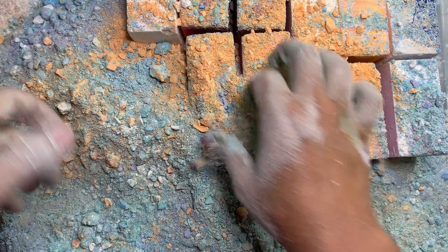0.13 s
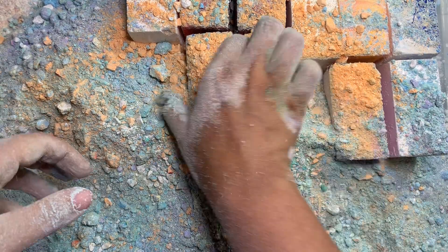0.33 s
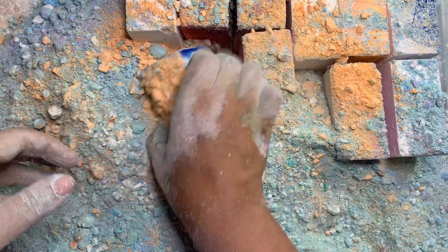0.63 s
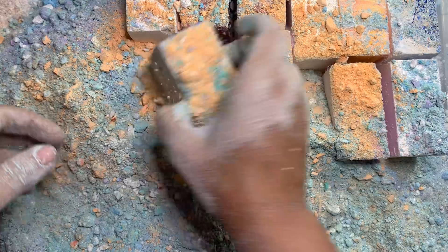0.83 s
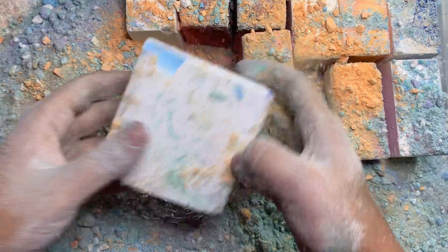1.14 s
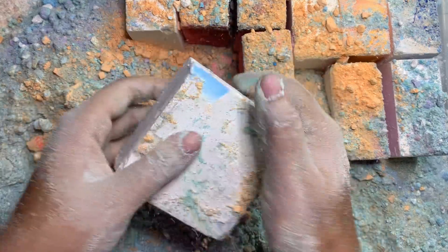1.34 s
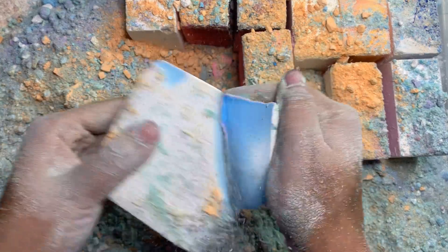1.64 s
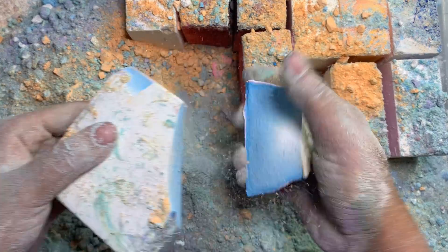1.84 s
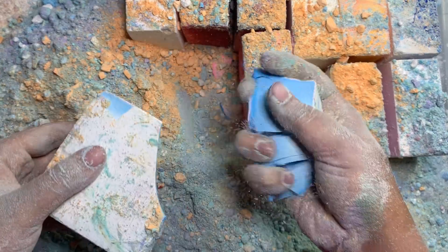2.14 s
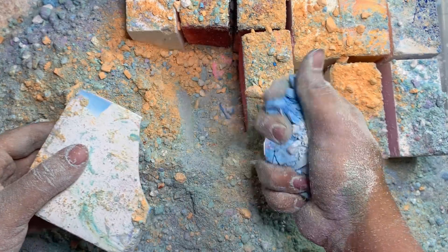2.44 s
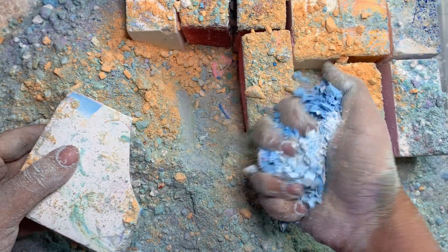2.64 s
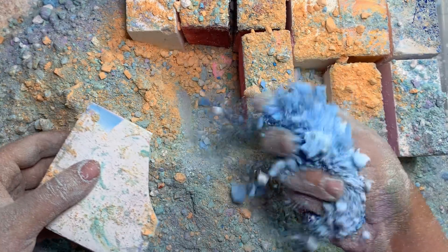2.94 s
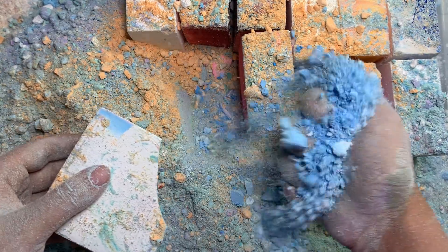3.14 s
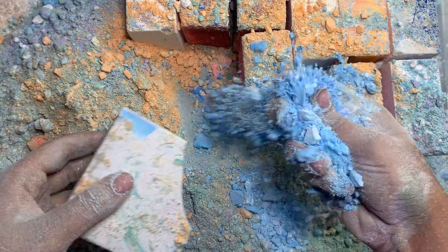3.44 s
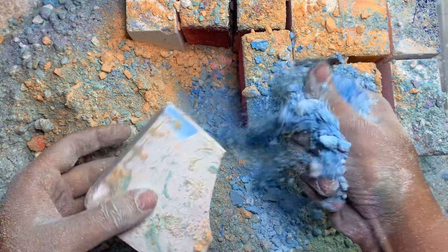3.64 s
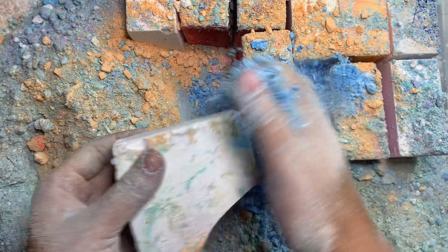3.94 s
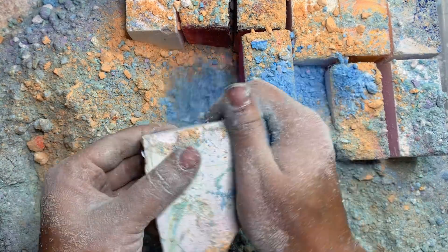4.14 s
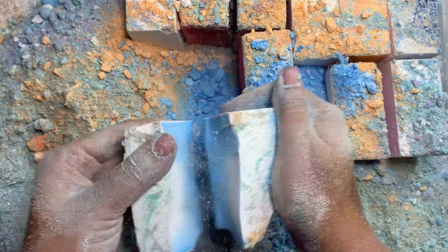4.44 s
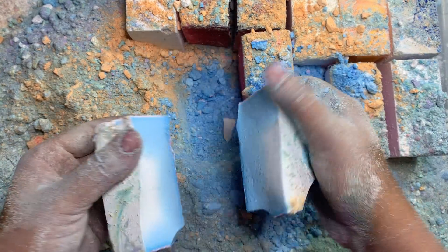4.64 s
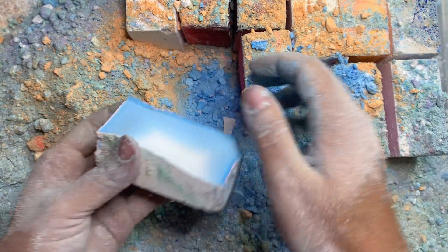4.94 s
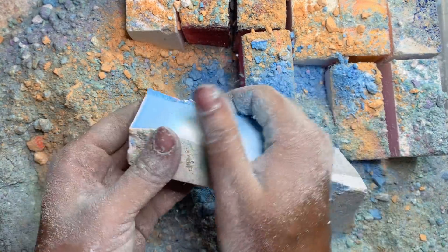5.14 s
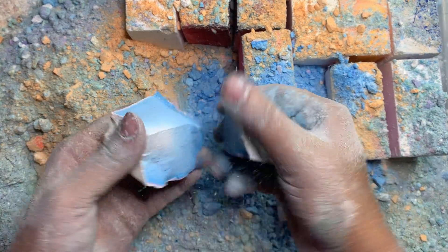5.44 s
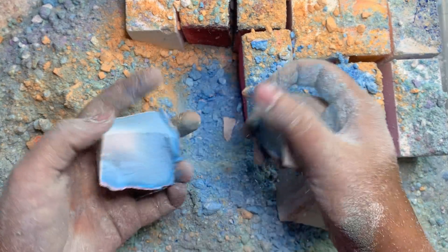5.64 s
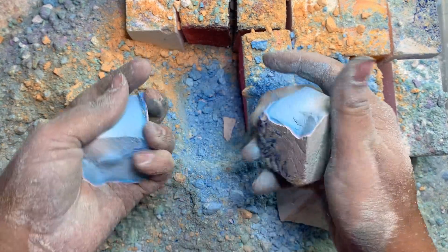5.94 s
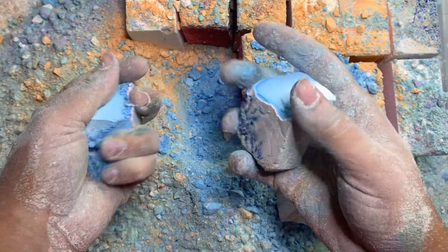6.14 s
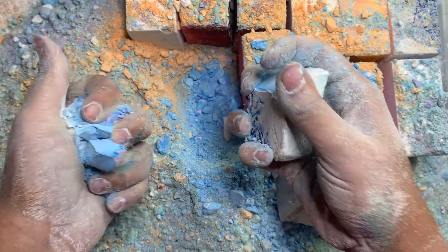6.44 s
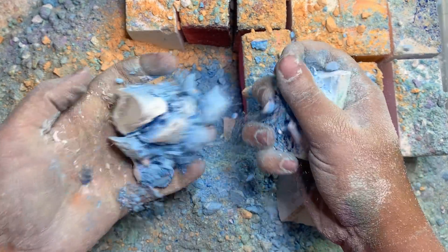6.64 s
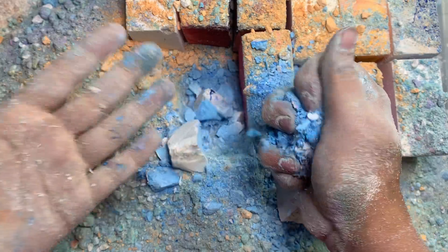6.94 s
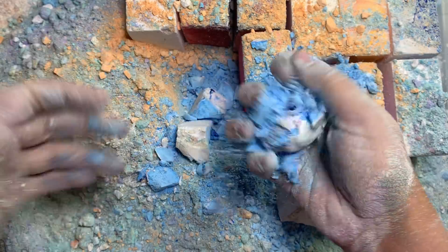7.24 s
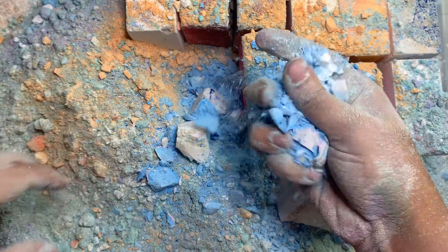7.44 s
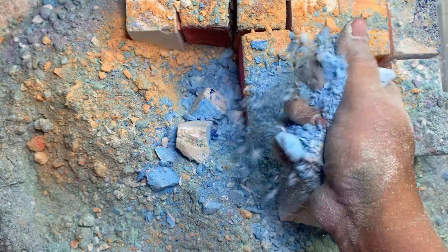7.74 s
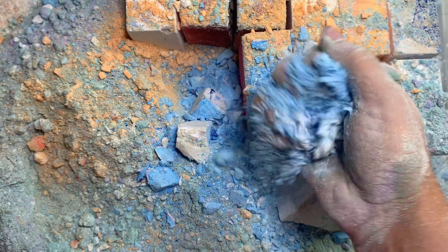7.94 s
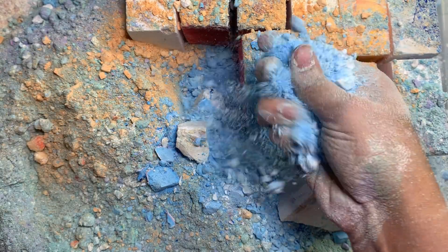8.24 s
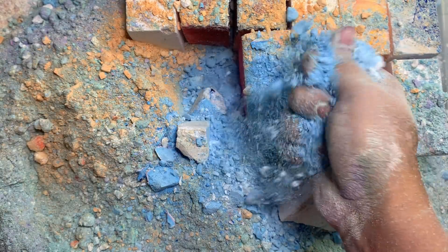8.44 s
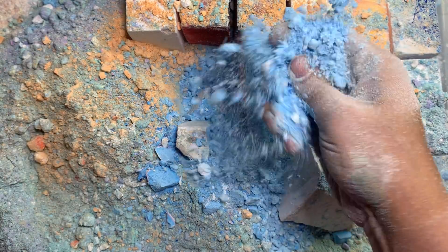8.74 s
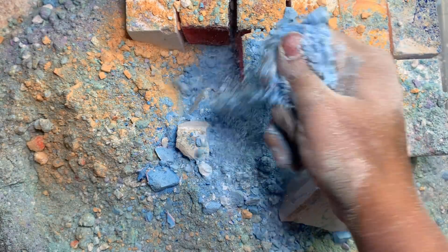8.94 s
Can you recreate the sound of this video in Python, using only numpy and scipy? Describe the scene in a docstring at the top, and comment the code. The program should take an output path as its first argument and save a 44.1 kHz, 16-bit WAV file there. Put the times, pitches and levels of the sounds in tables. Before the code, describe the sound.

Dry chalk breaks with crisp snaps and crunches into crumbs in squeezing hands, above a quiet low hum and soft swelling whoosh.

```python
"""A low appliance hum and a soft whoosh that swells and fades are heard first, with small rubs of fingers on chalk.
Hands then lift, snap and crumble soft chalk blocks over a table, close to a two-port microphone indoors.
Hum, air and whoosh are filtered noise; grit is clicks and powdery hiss shaped by hand pressure.
Cracks are short bursts of fractures, some with a thump of the block; bumps excite table resonances.
Fingers sliding on whole pieces make them ring faintly: the rubbing drives narrow resonances."""
import sys
import numpy as np
from scipy import signal
from scipy.fft import rfft, irfft
from scipy.io import wavfile
from scipy.ndimage import uniform_filter1d

SR = 44100
rng = np.random.default_rng(int(sys.argv[2]) if len(sys.argv) > 2 else 0)


def invert_db(x):
    """Field ratio 10**(x/20) for x, a level in decibels (scalar or array-like)."""
    u = np.asarray(x, float) / 20
    return 10 ** u


def persist_wave(psi):
    """Save psi, clipped to +-1, as 16-bit WAV."""
    counts = np.round(np.clip(psi, -1, 1) * 32767).astype(np.int16)
    wavfile.write(sys.argv[1], SR, np.atleast_2d(counts).T)


N = 400428
T = np.arange(N) / SR


def curve(table):
    """Columns of a breakpoint table, interpolated at every sample."""
    s, *columns = np.transpose(table)
    return [np.interp(T, s, c) for c in columns]


def unit(x):
    """Scale to rms 1."""
    return x / np.sqrt(np.mean(x ** 2))


def colour(x, points):
    """Causal filter through (Hz, dB) points, built from the cepstrum of the log gain."""
    hz, db = np.transpose(points)
    bins_hz = np.linspace(1, SR / 2, 2049)
    gain_db = np.interp(np.log(bins_hz), np.log(hz), db)
    cepstrum = irfft(np.log(invert_db(gain_db)))
    # folding the cepstrum onto positive time gives minimum phase
    cepstrum[1:2048] *= 2
    cepstrum[2049:] = 0
    impulse = irfft(np.exp(rfft(cepstrum)))
    impulse = impulse.reshape((1,) * (x.ndim - 1) + (-1,))
    return signal.fftconvolve(x, impulse, axes=-1)[..., :x.shape[-1]]


def ring(x, modes):
    """Sum of resonances (Hz, width Hz, dB); each dB is the mode's own gain at its centre."""
    return sum(invert_db(db) * signal.lfilter(*signal.iirpeak(hz, hz / width, SR), x) for hz, width, db in modes)


def walk(rate):
    """Random levels held 1 / rate s and slewed twice; spread near 1."""
    hold = int(SR / rate)
    steps = np.repeat(rng.standard_normal(N // hold + 1), hold)
    return 1.3 * uniform_filter1d(uniform_filter1d(steps, hold), hold)[:N]


def grains(rate, spread_db):
    """Random clicks, mostly tiny, a few large; rate in clicks per second."""
    chance = rng.random((3, N))
    happens = chance[0] < rate / SR
    sign = np.sign(chance[1] - .5)
    return happens * sign * invert_db(-spread_db * np.log(chance[2] + 0.0013))


def add(out, s, x, db):
    """Place a sound at s with its peak at db."""
    i = int(s * SR)
    out[i:i + len(x)] += (invert_db(db) * x / np.abs(x).max())[:N - i]


# resonances of the appliance, balanced among themselves: centre_hz, width_hz, level_db
HUM_MODES = [(57.6, 3.7, 7.5), (73.4, 3.8, 4), (98.8, 6.9, -0.5), (133.38, 2.02, 10)]


def hum():
    """Appliance hum: noise in narrow low resonances, so each tone wavers; two unrelated draws."""
    tones = ring(rng.standard_normal((2, N)), HUM_MODES)
    band = signal.butter(3, (33, 190), "bp", fs=SR, output="sos")
    return invert_db(-51) * unit(signal.sosfilt(band, tones))


# spectrum shape of the still air: frequency_hz, level_db
AIR_COLOUR = [(26, -6.5), (45, 5.5), (150, 8.5), (220, -36.5), (320, -1.5), (500, -36), (800, -16),
              (2000, -39), (15000, -49.5)]


def air():
    """Still air: steady coloured noise; two unrelated draws."""
    return invert_db(-56) * unit(colour(rng.standard_normal((2, N)), AIR_COLOUR))


# swell and fade of the whoosh: time_s, level_db
WHOOSH_SWELL = [(0.0, -68), (0.68, -58), (1.6, -56), (1.95, -66), (2.4, -58), (3.44, -63.5), (4.47, -53.5),
                (5.06, -65.5), (7.2, -57), (8.47, -68), (9.08, -65)]
# spectrum shape of the whoosh: frequency_hz, level_db
WHOOSH_COLOUR = [(180, -24.5), (290, 2), (410, 2), (560, -1.5), (680, -13), (1000, -42.5)]


def whoosh():
    """Soft whoosh: coloured noise with a slow level curve; two unrelated draws."""
    level_db, = curve(WHOOSH_SWELL)
    return invert_db(level_db) * unit(colour(rng.standard_normal((2, N)), WHOOSH_COLOUR))


def movement(s, length):
    """Power shape of one hand movement: pressure swells to a peak at s and eases off."""
    rise_share = 0.48  # rise time against fall time
    edge_db, shoulder = -26, 0.96  # level one length after the peak; roundness of the top
    near = slice(max(int((s - 4 * length) * SR), 0), int((s + 4 * length) * SR))
    away = np.where(T[near] < s, (s - T[near]) / rise_share, T[near] - s) / length
    return near, invert_db(edge_db * away ** shoulder) ** 2


# loose rubble trickling and shifting: time_s, crumbs_db, powder_db
TRICKLE = [(0, -76.5, -78.5), (0.95, -92, -87), (1.2, -78, -77.5), (2.07, -80, -83), (2.2, -52, -57.5),
           (2.52, -51, -53.5), (2.62, -57.5, -63.5), (3.3, -58, -72), (3.47, -62, -69.5),
           (3.6, -59.5, -62.5), (3.85, -62.5, -68.5), (4.2, -79.5, -85), (4.72, -74.5, -66.5),
           (4.97, -91, -80), (5.3, -67, -69), (5.85, -75.5, -69), (6.2, -58.5, -60.5), (6.42, -64.5, -62),
           (6.7, -68, -72), (7.9, -60, -67.5), (8.11, -75, -109), (8.5, -67, -73), (8.8, -60.5, -73.5),
           (9.08, -66, -70)]
# fingers rub or squeeze once: most_pressure_s, crumbs_db, powder_db, length_s
STROKES = [(0.016, -58.5, -56, 0.097), (0.156, -65.5, -80, 0.06), (0.303, -66, -65.5, 0.054),
           (0.616, -68, -63.5, 0.21), (0.814, -65.5, -68, 0.19), (1.051, -66.5, -63, 0.27),
           (1.161, -53.5, -49, 0.037), (1.254, -71.5, -60.5, 0.085), (1.392, -63.5, -58, 0.11),
           (1.792, -71, -58, 0.13), (1.962, -61, -52, 0.17), (2.165, -36.5, -57, 0.091),
           (2.453, -47.5, -51, 0.083), (3.99, -63.5, -57.5, 0.14), (4.101, -57, -60.5, 0.091),
           (4.638, -73, -58, 0.048), (4.794, -57.5, -54, 0.11), (4.887, -70, -57, 0.02),
           (5.105, -67, -53.5, 0.21), (5.411, -76, -54, 0.086), (5.51, -65, -49, 0.038),
           (5.66, -73, -53.5, 0.081), (5.708, -70, -55.5, 0.074), (5.771, -67, -48, 0.042),
           (5.871, -65.5, -56, 0.14), (5.941, -65, -54, 0.1), (6.509, -47, -46, 0.12),
           (6.794, -54.5, -61.5, 0.31), (6.937, -47, -42.5, 0.033), (7.248, -51, -59.5, 0.049),
           (7.417, -47.5, -53, 0.14), (7.543, -50, -58, 0.1), (7.984, -50.5, -57, 0.11),
           (8.248, -54, -61.5, 0.42), (8.7, -54, -82, 0.053), (8.972, -56, -62.5, 0.094)]


def pressure():
    """Levels of crumbs and powder in dB: the trickle, each stroke, and the debris that every crack sheds."""
    # debris after a crack of length 1; its powder follows the brightness of dull cracks
    shed_db, shed_fine_db, shed_bright, shed_t60_s = -34, -28.5, 0.63, 0.2
    coarse, fine = (invert_db(db) ** 2 for db in curve(TRICKLE))
    for s, crumbs_db, powder_db, length in STROKES:
        near, shape = movement(s, length)
        coarse[near] += invert_db(crumbs_db) ** 2 * shape
        fine[near] += invert_db(powder_db) ** 2 * shape
    for s, db, _, bright_db, length in CRACKS:
        after = slice(int(s * SR), int(s * SR) + SR // 3)
        shed = (length * invert_db(db - 60 * (T[after] - s) / shed_t60_s)) ** 2
        coarse[after] += invert_db(shed_db) ** 2 * shed
        fine[after] += invert_db(shed_fine_db + shed_bright * min(bright_db, 0)) ** 2 * shed
    return [10 * np.log10(power) for power in (coarse, fine)]


# spectrum shape of crumbs and of coarse fractures: frequency_hz, level_db
COARSE = [(350, -19), (900, -6), (1400, -2), (2000, 0), (2900, -4), (3600, -0.5), (4600, -3.5), (6500, -12),
          (8500, -17.5), (14000, -46.5)]
# spectrum shape of powder and of fine fractures: frequency_hz, level_db
FINE = [(2500, -23.5), (4200, -4.5), (5300, -1.5), (6300, -1.5), (7800, -9.5), (9500, -5.5), (13500, -13),
        (15500, -13), (16000, -33.5)]


def grit():
    """Crumbs of several sizes tick and ring briefly; powder hisses; pressure comes in small jerks."""
    coarse_db, fine_db = pressure()
    jerk = invert_db(2.4 * walk(60))
    ticks = unit(grains(900, spread_db=4) * jerk)
    sizes_hz = 950 * 1.35 ** np.arange(7)
    crumbs = sum(ring(grains(400, spread_db=3.1) * jerk, [(hz, hz / 4, 0)]) for hz in sizes_hz)
    powder = unit(rng.standard_normal(N) * jerk)
    coarse = unit(colour(ticks + 1.8 * unit(crumbs) + 1.4 * powder, COARSE))
    fine = unit(colour(ticks + 1.36 * powder, FINE))
    # a bright rub of skin on powder moves few big crumbs, so its low end thins out; a dull crumble is warmer
    low = signal.sosfilt(signal.butter(2, 2200., fs=SR, output="sos"), coarse)
    thin = np.clip((fine_db - coarse_db + 5.) / 8., -.3, .9)
    rubbing = invert_db(coarse_db) * (coarse - thin * low) + invert_db(fine_db) * fine
    return rubbing + palms(powder + 1.1 * ticks)


# palms scuff over blocks and rubble, a duller rub: most_pressure_s, level_db, length_s, resonance_hz
SCUFFS = [(0.56, -58.5, 0.15, 1000), (0.59, -59, 0.1, 1480), (0.758, -67.5, 0.2, 1220),
          (2.152, -47, 0.058, 860), (4.412, -49.5, 0.1, 850), (5.269, -46.5, 0.091, 860),
          (6.512, -48, 0.092, 690), (8.248, -58, 0.054, 1300)]


def palms(rub):
    """Each scuff rubs through the hollow between palm and chalk, a broad resonance applied twice."""
    out = np.zeros(N)
    for s, db, length, hz in SCUFFS:
        near, shape = movement(s, length)
        hollow = [(hz, hz * .55, 0)]
        scuff = unit(ring(ring(rub[near], hollow), hollow))
        out[near] += invert_db(db) * np.sqrt(shape) * scuff
    return out


# the block bumps the table: start_s, peak_db
BUMPS = [(0.652, -27), (0.698, -39)]
# resonances of the table: centre_hz, width_hz, level_db
TABLE_MODES = [(122, 30, 0), (330, 150, -10)]


def bumps():
    """A short soft push sets the low table resonances ringing."""
    out, t = np.zeros(N), T[:SR // 10]
    for s, db in BUMPS:
        add(out, s, ring(t * np.exp(-t / 0.00069), TABLE_MODES), db)
    return out


# a whole piece is held and rubbed: start_s, end_s, ring_db (against the rubbing)
SLIDES = [(0.95, 1.3, 11), (4.6, 4.92, 14)]
# resonances of the full block, then of the broken piece: centre_hz, width_hz, level_db
PIECE_MODES = [
    [(2500, 50, 3), (2990, 60, 0), (3700, 120, -1), (5260, 150, -6), (5960, 180, -9)],
    [(2261, 35, 1), (3950, 160, -2), (4450, 140, 3), (6170, 200, -12)],
]


def held(near):
    """While a piece is whole, rubs and ticks drive its narrow modes; the shifting grip frees or damps each one."""
    out = 0
    for (start, end, db), modes in zip(SLIDES, PIECE_MODES):
        during = (T > start) * (T < end)
        for mode in modes:
            grip = invert_db(6 * walk(20))
            out = out + invert_db(db) * ring(near * during * grip, [mode])
    return out


# cracks: peak_s, level_db, lump_resonance_hz, brightness_db (below 0 lowers the fine part, above 0 the coarse),
# length (1 gives a main decay constant of 1.1 ms)
CRACKS = [(6.029, -38, 4070, 0, .8), (6.9855, -41, 6500, 8, .8), (7.089, -44, 1900, -24, 1.7),
          (8.1624, -39.5, 2050, -10, 1), (2.351, -34, 1320, 5, 1.2), (2.4784, -39.5, 1400, -8, 0.85),
          (2.5980, -48.5, 4010, -11, 1), (2.8368, -39.5, 1670, -14, 2.5), (3.02, -41, 6500, 11, 1.3),
          (3.3690, -49, 6240, 0, 3), (3.9247, -47, 2050, -17, 2.1), (1.065, -43, 3700, 19, 1.9),
          (1.204, -46, 3020, 6, 1.4), (1.342, -41.5, 3400, 27, 1.5), (4.331, -46, 3100, 4, 2),
          (5.924, -39, 2270, -1, 1.2), (7.942, -43.5, 1900, -24, 1.47), (8.814, -43, 3000, -7, 2.9),
          (1.5965, -27, 3960, -2, 2.46), (2.1005, -20, 2340, -16, 3.4), (2.1419, -18.5, 1730, -8, 3.8),
          (2.1504, -25, 1870, -5, 1.4), (2.179, -17.5, 2470, -14.5, 2.8), (2.195, -21.5, 3480, -16, 0.81),
          (2.227, -33, 3740, -8, 1.5), (2.259, -34, 5500, -8, 2), (2.2706, -25, 3120, -14, 2.5),
          (2.29, -28.3, 1360, -20, 0.81), (2.306, -31, 2090, -13, 2.5), (2.322, -35, 1360, 1, 2.5),
          (2.395, -29, 2070, -9, 1.5), (2.4101, -25, 1570, -13, 2.5), (2.45, -38.5, 3600, -8, 1.8),
          (2.4638, -31, 1460, -14, 2.3), (6.719, -41, 1550, -13, 1.6), (2.5513, -30, 3700, -18, 1.7),
          (3.5078, -21.5, 3040, -40, 2.05), (3.518, -33, 3400, -29, 4.3), (3.663, -36.5, 1610, -33, 0.69),
          (4.393, -14.5, 3020, -7.5, 1.4), (4.8013, -28.5, 4370, 34, 1.65), (5.2497, -15.5, 3500, -5, 1.95),
          (6.067, -38.5, 6360, 27, 3.7), (6.093, -22.5, 2180, -17, 2.7), (6.155, -33.5, 1860, -5.5, 3.4),
          (6.2445, -30.5, 2000, 4, 1.6), (6.2742, -34, 2460, -21, 2.9), (6.283, -25.5, 1910, -12, 0.95),
          (6.338, -36, 6460, 3, 1.9), (6.4468, -36, 2510, 0.5, 2.9), (6.505, -24.5, 3730, -2.5, 0.85),
          (6.7822, -27, 2480, -41, 1.1), (6.8323, -27, 3770, -8.5, 1.55), (6.8407, -33, 2610, -20, 1.8),
          (6.8615, -42, 2670, 0, 1.7), (6.903, -39, 6500, 11, 1.9), (6.9312, -24, 3840, -3, 2.2),
          (6.9461, -26, 2450, -36, 0.36), (6.958, -32, 6000, -14, 0.82), (6.997, -12, 3070, -22, 0.72),
          (7.0409, -24.5, 1710, -6, 1.1), (7.3832, -27.5, 3460, -16, 0.86), (6.701, -43, 3530, -4, 4.7),
          (7.433, -32, 1900, -28, 1.72), (7.4425, -32, 1840, -27, 0.92), (7.556, -27, 3670, -13, 1.2),
          (7.6404, -21, 1900, -11, 1.64), (7.67, -35, 3300, -9, 3), (7.8402, -38, 2170, -14, 1.67),
          (8.2138, -29, 1890, -26, 1.7), (8.2496, -30, 1340, -2, 1.4), (8.263, -34.5, 4300, -2, 0.8),
          (8.272, -36, 3620, -7, 0.66), (8.2952, -25.5, 1290, -0.5, 0.96), (8.9064, -38.5, 1500, -7.5, 1.7)]


def cracks():
    """Each crack is a spiky burst of fractures that swells fast and dies in milliseconds, with a faint longer tail."""
    lead_s = .02  # a crack starts this long before its peak
    creak_db, creak_s = -25.5, 0.0069  # hairline fractures that build up before the break
    snap_db = 10  # main break at length 1, against the largest small fracture; longer cracks break less cleanly
    out, t = np.zeros(N), T[:SR // 10]
    late = t - lead_s
    for s, db, hz, bright_db, length in CRACKS:
        swell = np.exp(np.minimum(late, 0) / (0.00028 * length)) + invert_db(creak_db) * np.exp(late / creak_s)
        decay = np.exp(-late / (0.0011 * length)) + invert_db(-31.5 - 60 * late / 0.27)
        burst = np.where(late < 0, swell, decay)
        noise, spikes = rng.standard_normal((2, len(t)))
        fractures = burst * noise * invert_db(17.8 * uniform_filter1d(spikes, size=8))
        fractures[int(lead_s * SR)] = invert_db(snap_db) / length * np.abs(fractures).max()
        coarse = ring(fractures, [(hz, hz / 4, 0)]) + 0.59 * colour(fractures, COARSE)
        add(out, s - lead_s, coarse, db + min(-bright_db, 0) + 1.5)
        add(out, s - lead_s, colour(fractures, FINE), db + min(bright_db, 0) + 3.5)
    return out


# the block thumps as force lets go: release_s, peak_db, push_ms (time to the top of the push)
THUMPS = [(1.598, -21.5, 0.82), (2.101, -31.5, 0.86), (2.141, -28.5, 0.19), (2.18, -30.5, 0.4),
          (4.394, -15, 0.3), (5.25, -20.5, 0.083), (6.094, -37, 0.1), (6.502, -32.5, 0.046),
          (6.526, -36, 0.072), (6.814, -35, 0.079), (6.998, -41, 0.16)]
# resonances of the block: centre_hz, width_hz, level_db
BLOCK_MODES = [(333, 29, 15), (411, 93, 12), (920, 140, -4.5)]


def thumps():
    """The release of force is a soft push, a millisecond or less to its top, that rings the block."""
    out, t = np.zeros(N), T[:SR // 10]
    for s, db, ms in THUMPS:
        push = t * np.exp(-t / ms * 10 ** 3)
        add(out, s + 0.0011, -ring(push, BLOCK_MODES), db)
    return out


def echo(x, t60):
    """A diffuse tail of unit energy: noise that decays 60 dB in t60 seconds."""
    tail = rng.standard_normal(SR // 3) * invert_db(-60 * T[:SR // 3] / t60)
    return signal.fftconvolve(x, tail / np.sqrt(np.sum(tail ** 2)))[:N]


def scatter(near):
    """Hands and blocks scatter the shorter waves differently to each port, and keep moving."""
    short = signal.sosfilt(signal.butter(2, 500, "hp", fs=SR, output="sos"), near)
    turn = 2 * walk(5)  # radians
    return echo(short * np.cos(turn), .025) + echo(short * np.sin(turn), .025)


# how the two ports differ: frequency_hz, left_lead_radians, likeness (0-1)
PORTS = [(30, 0, .995), (250, -.1, .8), (720, 1.7, .25), (1350, -.2, .85), (2000, .7, .8), (2850, 1.9, .4),
         (4000, 1.2, .75), (4950, 3.1, .3), (6900, 6.2, .88), (7500, 6.4, .88), (9200, 9.3, .93),
         (10200, 9.5, .99), (11800, 12.4, .92), (12900, 12.7, .92), (14800, 15.8, .97)]
# level between the ports: frequency_hz, left_minus_right_db
BALANCE = [(30, -.6), (200, -2.4), (600, -.2), (2400, -1.8), (5500, 0)]


def two_ports(shared, apart):
    """Two ports hear a shared and an opposed field, mixed by likeness, with their own phase and level."""
    hz = np.arange(N // 2 + 1) * SR / N
    at, *columns = np.transpose(PORTS)
    lead, like = (np.interp(hz, at, c) for c in columns)
    balance_db = np.interp(hz, *np.transpose(BALANCE))
    side = np.array([[1], [-1]])  # left, right
    heard = np.sqrt((1 + like) / 2) * rfft(shared) + side * np.sqrt((1 - like) / 2) * rfft(apart)
    return irfft(heard * np.exp(side * .5j * lead) * invert_db(side * balance_db / 2), N)


def scene():
    """Hum, air and whoosh lie under the near sounds, which get a short room tail and scatter."""
    shared, apart = hum() + air() + whoosh()
    near = grit() + bumps() + cracks() + thumps()
    near = near + held(near)
    room_t60_s, room_db = .2, -21
    shared = shared + near + invert_db(room_db) * echo(near, room_t60_s)
    return two_ports(shared, apart + scatter(near))


def band_limit(x):
    """A steep low-pass at the top of the band."""
    return signal.sosfilt(signal.butter(12, 16510, fs=SR, output="sos"), x)


def record(dry):
    """Deliver the finished two-port mix."""
    return band_limit(dry)


dry = scene()
out = record(dry)
persist_wave(out)
```